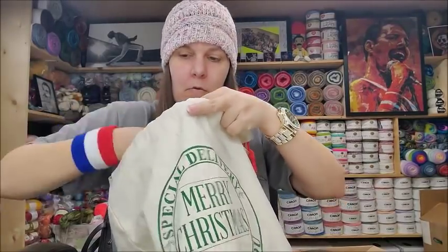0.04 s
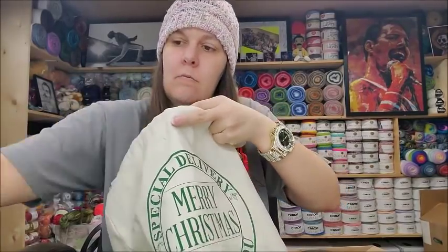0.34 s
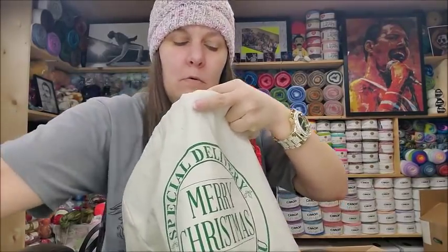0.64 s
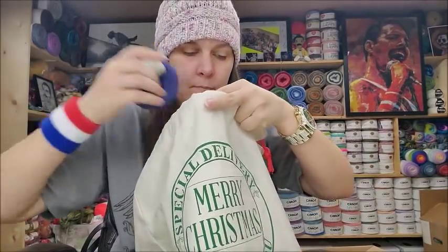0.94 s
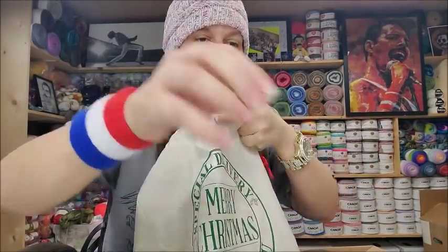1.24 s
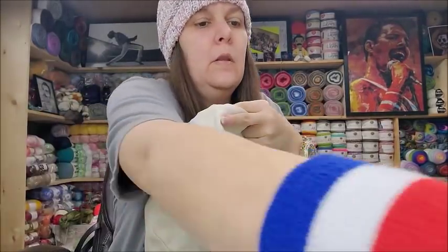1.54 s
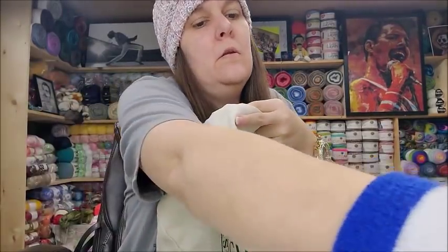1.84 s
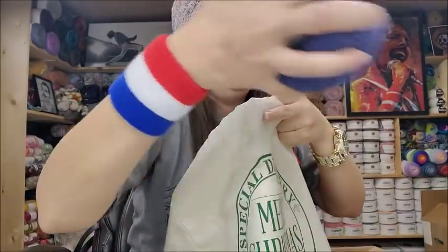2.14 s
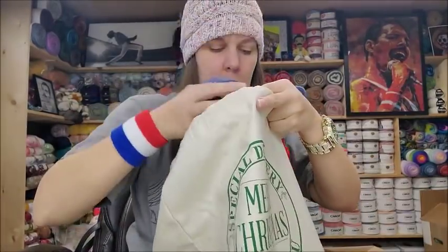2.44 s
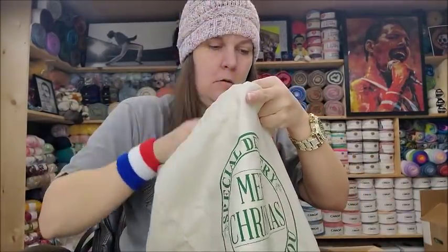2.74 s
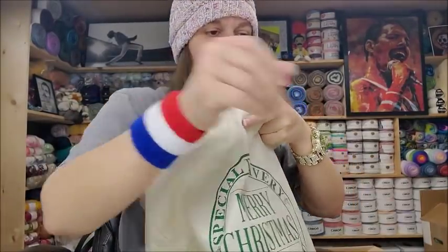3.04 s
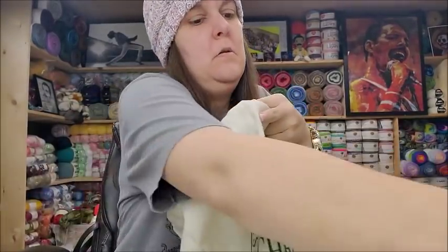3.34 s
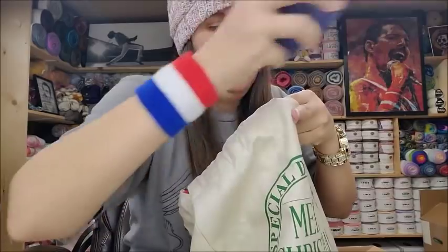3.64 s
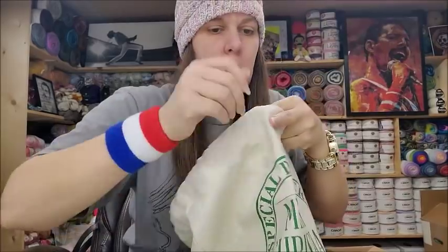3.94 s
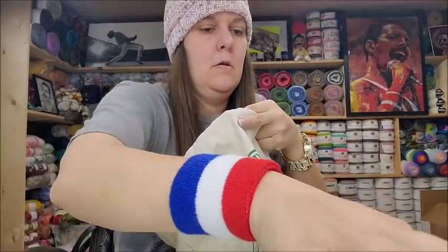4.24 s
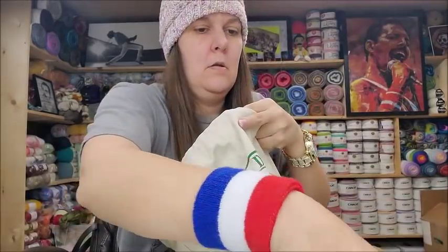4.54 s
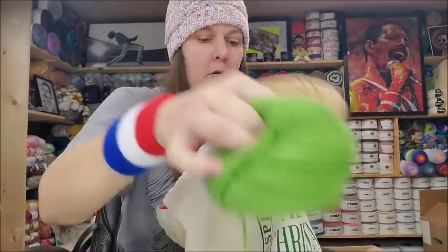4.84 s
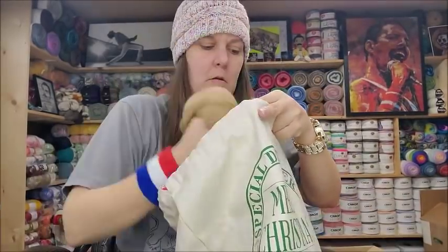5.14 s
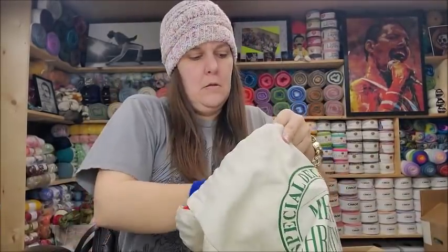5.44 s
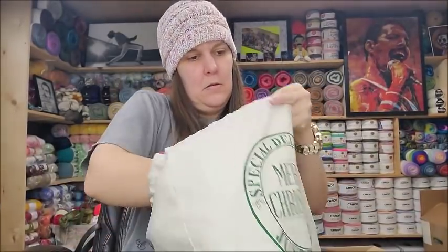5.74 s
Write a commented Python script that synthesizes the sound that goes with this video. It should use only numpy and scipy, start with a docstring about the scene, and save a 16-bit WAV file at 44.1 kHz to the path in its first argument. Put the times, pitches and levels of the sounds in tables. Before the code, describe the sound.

Hands rummage in a canvas sack, with irregular close rustling, crisp fabric snaps and soft bumps of yarn balls.

```python
"""Stuffing yarn into a canvas sack

Hands hold a sack open and push balls of yarn in, close up in a small, well-damped craft room.
The weave hisses and crackles as its threads catch and slip, stiff folds scrape and snap taut,
and the soft load shifts and bumps. Under it lie a low room rumble, a mains hum and faint
microphone hiss."""
import sys
import numpy as np
from scipy import signal
from scipy.fft import rfft, irfft, next_fast_len
from scipy.io import wavfile
from scipy.ndimage import uniform_filter1d, map_coordinates

SR = 44100
rng = np.random.default_rng(int(sys.argv[2]) if len(sys.argv) > 2 else 0)


def inscribe(sig):
    """Save sig as 16-bit PCM at rate SR to the path in sys.argv[1].

    A 1-D sig is mono; a 2-D sig holds one channel per row.
    Samples are clipped to [-1, 1] before scaling.
    """
    pcm = np.round(np.clip(np.atleast_2d(sig).T, -1, 1) * 32767)
    wavfile.write(sys.argv[1], SR, pcm.astype(np.int16))


N = 255339
T = np.arange(N) / SR


def cloth():
    """Each stroke rubs up four layers: the weave, its finest fibres, the stiff folds, the yarn inside."""
    # tone of the canvas hiss, the fibre sheen, the fold scrape and the load: (frequency [Hz], level [dB])
    weave_tone = [(1500, -51.5), (2400, -6), (3200, 2), (4300, -2), (5800, -1.5), (7700, 3.5), (8600, -1.5),
                  (9400, -14.5), (11000, -9.5), (14000, -19)]
    sheen_tone = [(7500, -7), (9500, -7.5), (11000, -4), (12500, 1.5), (16000, -0.5)]
    fold_tone = [(400, -31.5), (620, 10), (730, -6), (1000, 4.5), (1200, -4.5), (1400, 0), (1600, -8.5),
                 (1900, -2), (2400, -9), (3400, -32.5)]
    load_tone = [(15, -25), (45, -6), (70, 12), (110, 1), (170, -1), (240, -4.5), (300, -4.5), (390, 2.5),
                 (500, -3), (640, -8.5), (1000, -49)]
    weave, sheen, folds, load, _ = strokes()
    weave *= friction(weave_tone, slips_per_s=3000, spread_db=2, slide=0.765, clump_db=-1, clump_hz=63.8)
    sheen *= friction(sheen_tone, 6600, spread_db=2.5, slide=0.91, clump_db=1.33, clump_hz=66.4)
    folds *= friction(fold_tone, 900, spread_db=1.5, slide=0.59, clump_db=2.04, clump_hz=49.77)
    load *= friction(load_tone, 650, spread_db=2, slide=0.78, clump_db=1.8, clump_hz=39.3)
    return pockets(amp(-0.65) * weave + amp(3) * sheen + amp(0.3) * folds + load)


def strokes(swing_db=20, ease=1.22, settle_db=-31, settle_db_per_s=130, idle_pan_db=2.5):
    """Strokes speed up, hold and slow, then the cloth settles. Gives four layer gains and the pan."""
    # Hand and yarn slide along the cloth: pulling out, dropping balls in, a last deep push.
    # Rise and fall span swing_db; sheen, folds and load are relative to the weave's drive.
    # (full speed at [s], rise [s], hold [s], fall [s], weave drive [dB],
    #  sheen [dB], folds [dB], load [dB], pan to the left [dB])
    gestures = [ (.064, 0.036, 0.023, 0.16, -56.5, -0.5, -3, 7.5, 1.5),
                (0.148, 0.011, 0.028, 0.075, -56.5, 7.5, -4, 6, 2),
                (0.256, 0.036, 0.0074, 0.049, -54.5, -8.5, 0.5, 2, 5.5),
                (0.598, 0.0073, 0.0064, 0.07, -65.5, 0, -8, -3, -12.5),
                (0.698, 0.078, 0.022, 0.19, -61.5, 4, -27, -7, -12.5),
                (.845, 0.027, 0.015, 0.054, -76, -27, -5, 12, -0.5),
                (1.11, 0.035, 0.0095, 0.048, -70.5, -2.5, -23, -3, 2.5),
                (1.183, 0.056, 0.013, .08, -63.5, -1.5, -2, -6, 3.5),
                (1.283, 0.016, 0.0048, 0.073, -58, -5, -4.5, 2, 2.5),
                (1.637, 0.055, 0.013, .06, -59.5, 1, -4.5, -3.5, 8.5),
                (1.685, 0.061, 0.0091, 0.35, -65.5, -10, -0.5, 0.5, 8.5),
                (1.947, 0.059, 0.032, 0.032, -68, 3, 13.5, -0.5, 7),
                (2.516, 0.052, 0.064, 0.041, -59, 0.5, -1, -2.5, 3),
                (2.597, 0.025, 0.0042, 0.064, -65.5, -6, 1, -8, 2.5),
                (2.736, 0.036, 0.0039, 0.023, -68.5, -17, -15, -10, 5),
                (2.814, 0.0093, 0.021, 0.037, -61.5, -11, -9.5, -7, 8),
                (2.874, 0.023, 0.027, 0.045, -53, -1.5, 1, 5, 3),
                (2.918, 0.07, 0.018, 0.041, -50, -2, -4.5, 1, 2),
                (3.03, 0.061, 0.084, 0.087, -79, -4, -2, 8, 6),
                (3.183, 0.04, .022, 0.038, -56.5, -8, -8, -11, 3.5),
                (3.264, 0.041, .004, 0.11, -59, -4, -4, -7, 3),
                (3.376, 0.066, .04, 0.1, -63.5, -1.5, -4, 2.5, 8.5),
                (3.454, 0.013, 0.0089, 0.038, -55, 0.5, -5.5, 6, 10),
                (3.7, 0.15, 0.017, .13, -73.5, -2.5, 1.5, -9, 6),
                (3.907, 0.01, 0.027, 0.11, -63, -0.5, -13, -4, 2),
                (3.961, 0.039, 0.02, 0.097, -58, -1, -16, 0, 3),
                (4.025, 0.038, 0.0079, 0.017, -58.5, 1, 0, 1, 3.5),
                (4.276, 0.026, 0.0017, 0.022, -53, -3, -36, -30, 5),
                (4.444, 0.017, 0.098, 0.16, -69.5, 5, -8, -19, 5.5),
                (4.63, 0.071, .036, 0.14, -49.5, .5, -4.5, -31, 1),
                (4.728, 0.026, 0.016, 0.08, -55, -5, 6, -5, 10),
                (4.808, 0.1, 0.0066, 0.089, -55.5, 0.5, -21, -34, 2.5),
                (4.958, 0.018, .015, 0.19, -78.5, -5, -4, -7, 1.5),
                (5.236, 0.019, 0.061, 0.13, -67, -5, -15, -9, 16),
                (5.389, 0.15, 0.081, 0.1, -54.5, -1.5, -4, -3, 5),
                (5.545, 0.076, .1, 0.064, -54.5, -2.5, -4, -5.5, 3.5),
                (5.731, 0.15, .065, .1, -49, -.5, -5, -0.5, 3.5)]
    t = T[::32]
    idle = amp([-90, -85.5, -87, -95])  # weave, sheen, folds, load: a held sack is never quite still
    power = idle[:, None] ** 2 * np.ones(len(t))
    weighted_pan = idle_pan_db * power.sum(0)
    for start, rise, hold, fall, db, sheen_db, folds_db, load_db, pan_db in gestures:
        before, after = np.maximum(start - t, 0), np.maximum(t - start - hold, 0)
        attack_db = -swing_db * (before / rise) ** ease
        release_db = np.maximum(-swing_db * (after / fall) ** ease, settle_db - settle_db_per_s * after)
        stroke = np.outer(amp([0, sheen_db, folds_db, load_db]), amp(db + attack_db + release_db)) ** 2
        power += stroke
        weighted_pan += pan_db * stroke.sum(0)
    return [np.interp(T, t, curve) for curve in (*np.sqrt(power), weighted_pan / power.sum(0))]


def friction(tone, slips_per_s, spread_db, slide, clump_db, clump_hz):
    """Threads catch and slip in tiny clicks of uneven size, clumped, over a smooth sliding noise."""
    noise = rng.standard_normal(N)
    sizes = amp(spread_db * np.minimum(rng.exponential(1, N), 4)) * np.sign(noise)
    slips = unit(sizes * (rng.random(N) < slips_per_s / SR))
    clumps = amp(clump_db * wander(clump_hz))
    return colour((slips + slide * noise) * clumps, tone)


def pockets(x, depth_db=3.0):
    """Hollows between hand and cloth open and close, so narrow resonances come and go."""
    spectrum = signal.stft(x, SR, nperseg=512)[2]
    patches = uniform_filter1d(rng.standard_normal(spectrum.shape), size=3, axis=0)
    patches = unit(uniform_filter1d(patches, size=16, axis=1))  # narrow in pitch, drawn out in time
    depth = depth_db / (1 + np.linspace(0, 1, len(spectrum)))[:, None]  # shallower towards the treble
    return signal.istft(spectrum * unit(amp(depth * patches)), SR, nperseg=512)[1][:N]


def bumps(reach_octaves=0.47, crush=0.65, rise_s=0.0025, heave_hz=229.5, heave_t60=0.061):
    """A soft blow rings the sack and crushes the padding in a dull puff; hard blows heave the load."""
    # soft knocks of hand, yarn and sack: (time [s], level [dB], centre [Hz], decay t60 [s])
    blows = [(.031, -53, 400, 0.038), (.111, -30.5, 340, 0.039), (.121, -36, 332, .045),
             (.166, -33.5, 340, 0.043), (.268, -40, 690, .022), (.631, -45.5, 425, 0.023),
             (.833, -51.5, 463, .027), (.85, -64, 990, 0.17), (1.109, -62.5, 330, 0.081),
             (1.196, -49, 222, 0.044), (1.291, -45.5, 830, 0.038), (1.606, -47.5, 328, 0.024),
             (1.756, -54.5, 525, 0.049), (1.945, -52.5, 620, 0.086), (2.501, -44.5, 450, 0.09),
             (2.509, -42.5, 1010, 0.05), (2.601, -45, 387, 0.035), (2.62, -49, 724, 0.018),
             (2.87, -40, 407, 0.019), (2.9, -42, 242, 0.073), (2.932, -46, 507, 0.016),
             (3.2, -51, 810, 0.046), (3.404, -44, 350, 0.031), (3.946, -38.5, 884, 0.04),
             (4.438, -50.5, 750, 0.05), (4.469, -50.5, 910, 0.018), (4.71, -31.5, 547, 0.06),
             (5.564, -46, 384, 0.036)]
    # resonances of the loaded sack: (frequency [Hz], level [dB])
    modes = [(150, 23), (245, 4.5), (350, 4), (405, 5), (490, -1), (740, -5.5), (990, -2.5), (1330, -14.5),
             (1820, -2)]
    out, t = np.zeros(N), np.arange(SR // 8) / SR
    mode_hz, mode_db = np.transpose(modes)
    waves = np.sin(2 * np.pi * mode_hz[:, None] * t)
    attack = 1 - np.exp(-t / rise_s)
    for start, db, hz, t60 in blows:
        nearness = np.exp(-0.5 * (np.log2(mode_hz / hz) / reach_octaves) ** 2)
        ring = (amp(mode_db) * nearness) @ waves
        puff = band(rng.standard_normal(len(t)), hz, octaves=1.17)
        blow = peaked((crush * unit(puff) - unit(ring)) * attack * decay(t, t60))
        thud = band(rng.standard_normal(len(t)), heave_hz, octaves=0.65)
        heave = peaked(thud * attack * decay(t, heave_t60))
        heave_db = -5.5 + 0.87 * (db + 32)  # relative to the blow: harder ones carry more weight
        add(out, start, amp(db) * (blow + amp(heave_db) * heave))
    return out


def snaps(kick=2.0, crack_s=0.00026, flutter=0.31, skirt=0.45):
    """A fold snaps taut or a finger flicks the cloth: a sharp crack, then a short flutter of fabric."""
    # cracks of the canvas: (time [s], level [dB], centre [Hz], core width [octaves], flutter t60 [s])
    cracks = [(.0734, -32.5, 3170, 1.3, 0.022), (.15, -42, 11700, 0.55, 0.067), (.396, -67, 2820, 1.2, .06),
              (.598, -43, 12700, .35, 0.11), (.6322, -49, 4340, 1.2, .028), (.835, -55, 2940, 0.66, 0.034),
              (1.282, -52.5, 1840, 0.48, 0.034), (2.505, -49, 2340, 0.81, 0.17),
              (2.858, -52, 5960, 1.1, 0.032), (2.873, -43.5, 2380, 1.3, 0.086),
              (3.076, -64, 3900, 0.95, 0.03), (3.658, -65.5, 5960, 0.9, 0.087),
              (3.947, -32, 2880, 1.55, 0.014), (4.259, -55, 9000, 0.91, 0.066),
              (4.2783, -41.5, 7960, 1.3, 0.023), (4.713, -42, 3660, 1.3, 0.095)]
    out, t = np.zeros(N), np.arange(SR // 8) / SR
    for start, db, hz, octaves, t60 in cracks:
        burst = rng.standard_normal(len(t)) * (np.exp(-t / crack_s) + flutter * decay(t, t60))
        burst[0] = kick
        snap = band(burst, hz, octaves) + skirt * band(burst, hz, 2 * octaves)
        add(out, start, amp(db) * peaked(snap))
    return out


def microphones(x, shadow_hz=330, lead_s_per_db=4e-5, roam_s=1.6e-5):
    """The microphone nearer to the hands hears them earlier and, above the bass, louder."""
    pan_db = strokes()[-1]
    lead_s = lead_s_per_db * pan_db / 2 + roam_s * wander(hz=40.08)  # the rubbing spot hops about
    bass = signal.sosfilt(signal.butter(1, shadow_hz, fs=SR, output="sos"), x)
    direct_db = 1.36 * pan_db  # direct sound is more one-sided than the sum with its echoes
    pair = []
    for sign in (1, -1):
        heard = bass * amp(sign * direct_db / 6) + (x - bass) * amp(sign * direct_db / 2)
        pair.append(map_coordinates(heard, [(T + sign * lead_s) * SR], order=3))
    return np.array(pair) / np.sqrt((amp(direct_db) + amp(-direct_db)) / 2)


def early_echoes(surfaces_db=-9.5, clutter_db=-5, clutter_t60=0.056, scatter_hz=900):
    """Impulse response of desk and shelves: a few distinct echoes in a dense scatter off odds and ends."""
    # nearest surfaces: (left delay [s], right delay [s], relative level [dB])
    surfaces = [(.0012, .0007, -9), (.0028, .0023, -11), (.0047, .0058, -13), (.0078, .0071, -14),
                (.0098, .0107, -16), (.0195, .0188, -20)]
    taps = np.zeros((2, SR // 2))
    for left_s, right_s, db in surfaces:
        taps[[0, 1], [round(left_s * SR), round(right_s * SR)]] += amp(db)
    clutter = rng.standard_normal(taps.shape) * decay(T[:SR // 2], clutter_t60)
    echoes = amp(surfaces_db) * taps + amp(clutter_db) * clutter / np.linalg.norm(clutter[0])
    low_cut = signal.butter(2, scatter_hz, "high", fs=SR, output="sos")  # small things reflect no bass
    return signal.sosfilt(low_cut, echoes)


def room(x, tail_db=-11, mono_hz=450, build_s=0.00067):
    """Early echoes, then a short tail that the yarn on the walls soaks up."""
    # reverb time of the room: (frequency [Hz], decay t60 [s])
    reverb_times = [(200, 0.09), (1000, 0.19), (4000, 0.11), (15000, 0.049)]
    early = early_echoes()
    hz, t, spectrum = signal.stft(rng.standard_normal(early.shape), SR, nperseg=256)
    shared = 1 / (1 + (hz[:, None] / mono_hz) ** 2)  # long waves reach both microphones alike
    spectrum[1] = shared * spectrum[0] + np.sqrt(1 - shared ** 2) * spectrum[1]
    spectrum *= decay(t, curve_at(reverb_times, hz)[:, None]) * (1 - np.exp(-t / build_s))
    tail = signal.istft(spectrum, SR, nperseg=256)[1][:, :SR // 2]
    response = early + amp(tail_db) * tail / np.linalg.norm(tail[0])
    return signal.oaconvolve(x[None], response, axes=1)[:, :N]


def room_tone(rumble_db=-51, width_db=-18, hiss_db=-78):
    """Rumble and hum sit near the centre; each microphone adds its own hiss."""
    # tone of the still room and of the microphone hiss: (frequency [Hz], relative level [dB])
    rumble_tone = [(8, -13), (20, -28), (32, 0.5), (45, 3.5), (58, 1.5), (75, -7), (105, -7.5), (140, -12),
                   (170, -26), (250, -29.5), (330, -36), (450, -37.5), (900, -70.5)]
    hiss_tone = [(150, 7), (400, 8.5), (700, 5.5), (1500, -2), (3500, -2), (7000, -11), (8300, -7),
                 (9300, -55), (11000, -21), (12700, -5.5), (16000, -11)]
    # mains hum and a fainter tone just above it: (frequency [Hz], level [dB])
    hum_tones = [(120, -63.5), (141, -73)]
    rumble = colour(rng.standard_normal(N) + amp(width_db) * rng.standard_normal((2, N)), rumble_tone)
    hum = sum(amp(db) * np.sqrt(2) * np.sin(2 * np.pi * hz * T + 0.16 * wander(hz=2))
              for hz, db in hum_tones)
    hiss = colour(rng.standard_normal((2, N)), hiss_tone)
    return amp(rumble_db) * rumble + hum + amp(hiss_db) * hiss


def amp(db):
    """Decibels to gain."""
    return 10 ** (np.asarray(db) / 20)


def decay(t, t60):
    """An envelope that falls 60 dB in t60 seconds."""
    return np.exp(-np.log(1000) * t / t60)


def unit(x):
    """Scales to an rms of one."""
    return x / np.sqrt(np.mean(x ** 2) + 1e-20)


def peaked(x):
    """Scales so that the loudest two milliseconds have an rms of one."""
    return x / np.sqrt(uniform_filter1d(x ** 2, size=88, mode="constant").max())


def curve_at(points, hz):
    """Reads a breakpoint curve on a log-frequency axis."""
    point_hz, value = np.transpose(points)
    return np.interp(np.log(hz + 1), np.log(point_hz + 1), value)


def colour(x, tone):
    """Equalises a full-length signal with a tone curve, at unit rms."""
    size = next_fast_len(N, True)
    gain = amp(curve_at(tone, np.fft.rfftfreq(size, 1 / SR)))
    return unit(irfft(rfft(x, size) * gain, size)[..., :N])


def wander(hz):
    """A random drift at unit rms, moving at rates up to about hz."""
    return unit(np.interp(2 * hz * T, np.arange(4096), rng.standard_normal(4096)))


def band(x, hz, octaves):
    """A broad resonance around hz."""
    edges = np.clip([hz / 2 ** (octaves / 2), hz * 2 ** (octaves / 2)], 20, [0.4 * SR, 0.48 * SR])
    return signal.sosfilt(signal.butter(2, edges, "band", fs=SR, output="sos"), x)


def add(mix, start, sound):
    """Mixes a sound in at start seconds."""
    part = mix[max(round(start * SR), 0):][:len(sound)]
    part += sound[:len(part)]


def scene(dip_hz=620, dip_q=6, sway_hz=3):
    """The handled sack, its echoes and the still room."""
    # a narrow dip hollows out the rubbing and the bumps
    dip = signal.iirnotch(dip_hz, dip_q, fs=SR)
    sack = signal.lfilter(*dip, cloth() + bumps()) + snaps()
    # as the arms move, the sound passes from one pattern of scattered echoes to another
    crossfade = 0.5 + 0.5 * np.cos(2 * np.pi * sway_hz * T + wander(hz=2))
    echoes = room(sack * crossfade) + room(sack * (1 - crossfade))
    return microphones(sack) + echoes + room_tone()


def record(dry):
    """A steep low-pass trims the very top of the treble."""
    low_pass = signal.firwin(511, cutoff=15900, window=("kaiser", 9), fs=SR)
    return signal.oaconvolve(dry, low_pass[None], "same")


dry = scene()
out = record(dry)
inscribe(out)
```